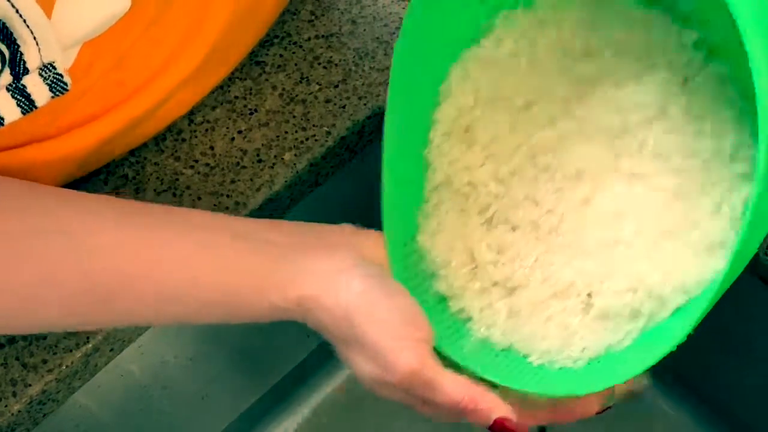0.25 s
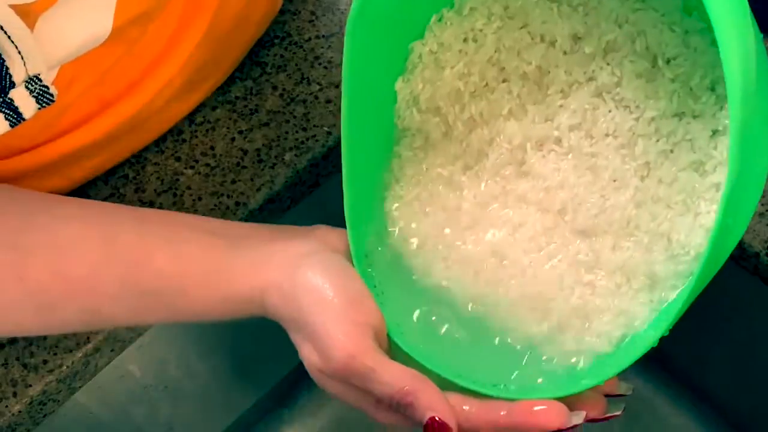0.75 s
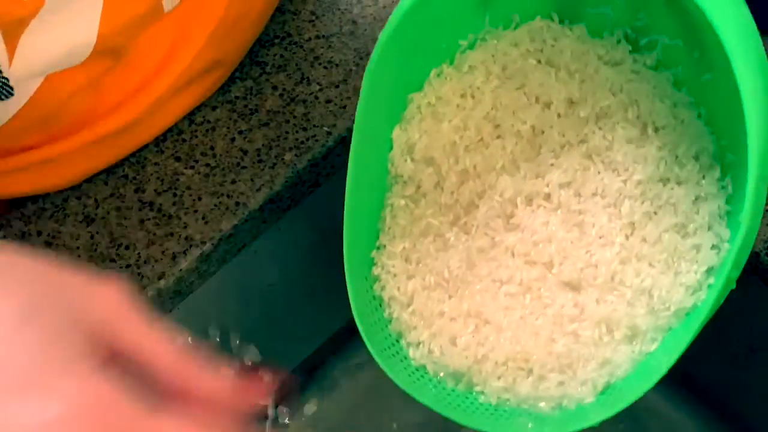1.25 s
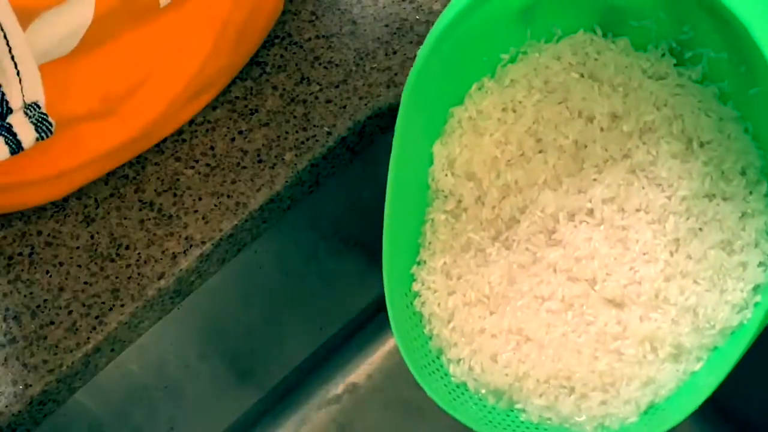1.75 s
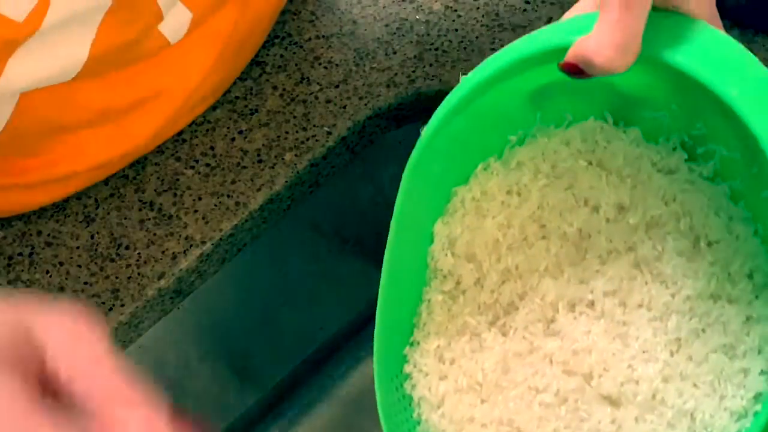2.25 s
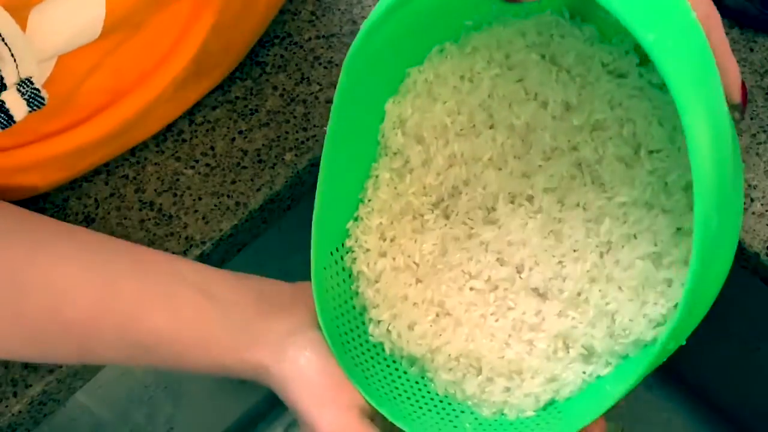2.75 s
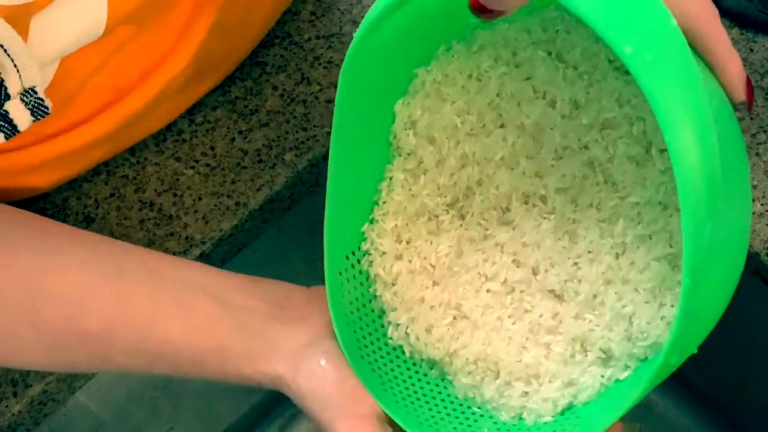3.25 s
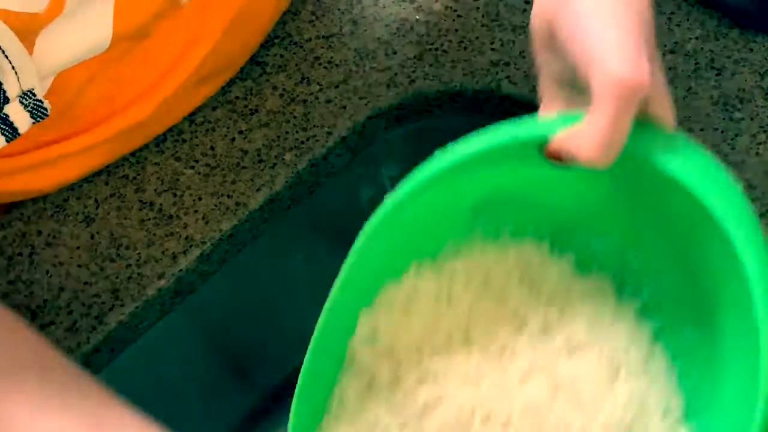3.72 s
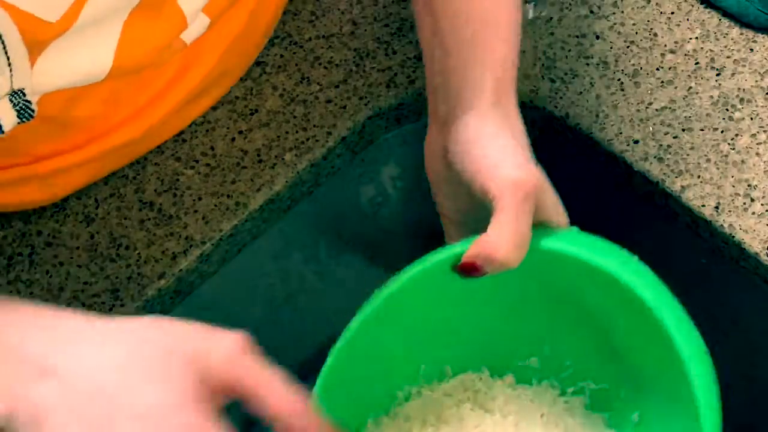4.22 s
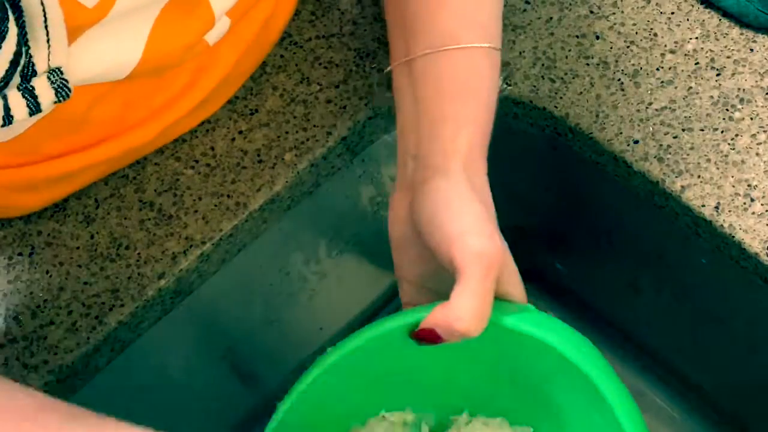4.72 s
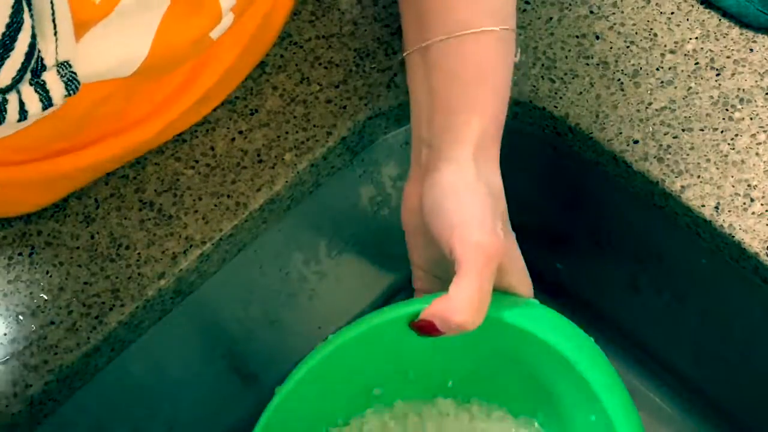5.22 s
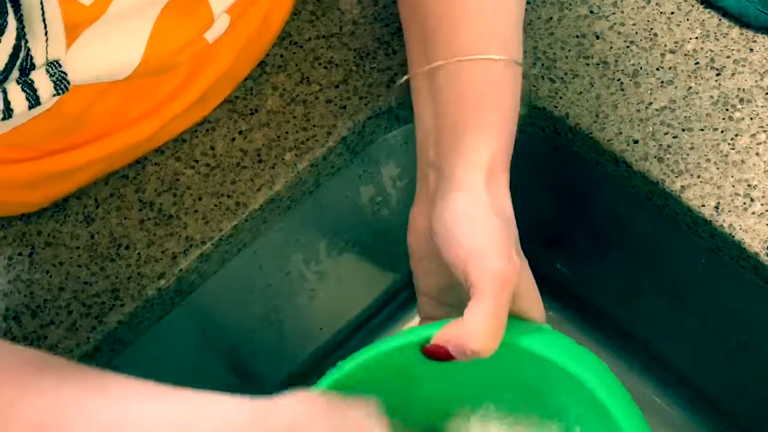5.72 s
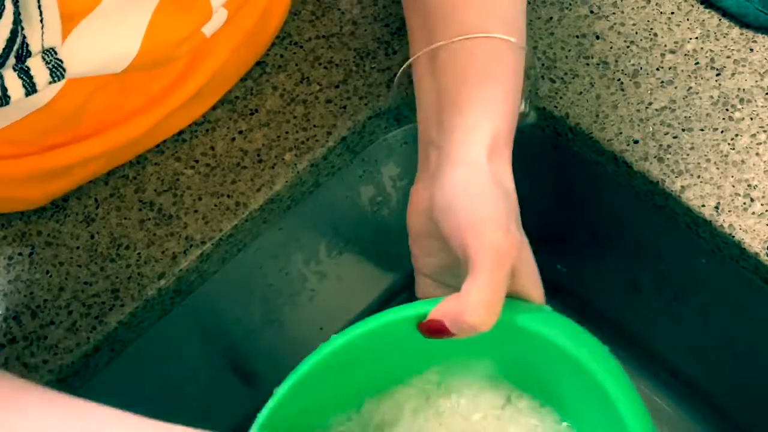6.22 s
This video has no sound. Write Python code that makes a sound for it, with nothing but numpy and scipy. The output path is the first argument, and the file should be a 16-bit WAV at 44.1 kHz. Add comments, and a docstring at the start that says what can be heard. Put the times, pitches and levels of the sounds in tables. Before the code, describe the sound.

A bright tap hiss and fizzing foam over rice in a plastic colander, water drumming on a steel sink, then softer gurgling with hollow plops.

```python
"""An aerated kitchen tap runs on rice in a plastic colander held over a steel sink: coloured noise hisses,
and foam on the grains fizzes as a cloud of tiny bursting bubbles.
Water draining through rings the sink's modes and spatters as random impacts and bubbles; fat drops slap.
Near four seconds the colander leaves the stream: the hiss drops and a softer flow gurgles into shallow
water, with ringing air pockets that rise slightly in pitch. Low room noise lies under everything."""
import sys
import numpy as np
from scipy import signal
from scipy.fft import rfft, irfft, next_fast_len
from scipy.io import wavfile
from scipy.ndimage import uniform_filter1d

SR = 44100
rng = np.random.default_rng(int(sys.argv[2]) if len(sys.argv) > 2 else 0)


def materialize(psi):
    """Save the field psi as 16-bit PCM at rate SR to the path in sys.argv[1].

    A 1-D psi becomes a single channel; in a 2-D psi each row is a channel.
    """
    bounded = np.clip(np.atleast_2d(psi).T, -1, 1)
    quanta = np.round(bounded * 32767).astype(np.int16)
    wavfile.write(sys.argv[1], SR, quanta)


N = 285327
TIME = np.arange(N) / SR

# Water draining from the colander, heaviest while it is tipped. Each row: time in seconds,
# drumming on the steel in dB, spatter in dB (both relative).
DRAINAGE = [(0, -38, -33), (.46, -41.5, -34), (.52, -35, -33), (1.33, -33.5, -33), (1.5, -40, -37),
            (2.9, -40, -36), (3.25, -40, -35), (3.8, -40, -36), (4.05, -51, -47.5), (4.45, -47, -45),
            (4.75, -59.5, -39), (5.45, -60, -44.5), (5.85, -51.5, -40.5), (6.47, -42.5, -45)]
# Large air pockets trapped in the puddle. Each row: start in seconds, peak in dB, pitch in Hz,
# swell in seconds, offshoot bubble in dB against the peak.
AIR_POCKETS = [(3.92, -42, 804, 0.0033, -12), (4.004, -38, 785, 0.0041, -15),
               (4.394, -33, 915, 0.0018, -15), (4.412, -28, 850, 0.00099, -12),
               (4.91, -22, 930, 0.0011, -13), (5.094, -33, 872, 0.0042, -14),
               (5.302, -37, 1030, 0.0013, -8), (5.5075, -27.5, 874, 0.0027, -10),
               (5.601, -34, 885, 0.0021, -10), (5.664, -30, 780, 0.0035, -6),
               (5.698, -31, 895, 0.0012, -10), (5.706, -29, 950, 0.0012, -14),
               (5.783, -27, 870, 0.0008, -12), (5.842, -27, 960, 0.0015, -6), (5.86, -35, 930, 0.0031, -9),
               (5.933, -30, 910, .0012, -15), (6.012, -30, 910, 0.0019, -11), (6.101, -31, 940, 0.001, -2),
               (6.117, -32, 920, 0.0017, -1), (6.137, -23.5, 796, 0.0024, -9), (6.217, -38, 810, 0.0022, 2),
               (6.3, -21.5, 820, 0.0019, -8), (6.318, -33, 910, 0.0033, -16),
               (6.346, -29, 837, 0.0031, -14), (6.365, -29, 950, 0.0022, -14),
               (6.38, -33, 890, 0.0013, -14), (6.417, -28, 806, 0.0032, -5), (6.426, -27, 888, 0.003, -5),
               (6.443, -28, 830, 0.002, -9)]


def from_db(db):
    """Decibels to gain."""
    return 10 ** (np.asarray(db) / 20)


def rms_one(x):
    """Scale to unit rms."""
    return x / np.sqrt(np.mean(x ** 2) + 1e-20)


def gains(rows):
    """Each dB column of a curve as a gain per sample."""
    s, *columns = np.transpose(rows)
    return [from_db(np.interp(TIME, s, c)) for c in columns]


def drift(rate_hz):
    """Slow random wander of spread 1: low-passed noise, drawn at every 40th sample."""
    step, settle = 40, 2000
    r = np.exp(-2 * np.pi * rate_hz * step / SR)
    noise = rng.standard_normal(N // step + settle + 2)
    slow = signal.lfilter([1], [1, -2 * r, r * r], noise)[settle:]
    return np.interp(np.arange(N) / step, np.arange(len(slow)), rms_one(slow))


def coloured(x, colour):
    """Give a signal a smooth spectrum, dB interpolated over log frequency; rms 1."""
    hz, db = np.transpose(colour)
    size = next_fast_len(N, True)
    log_hz = np.log(np.fft.rfftfreq(size, 1 / SR) + 1)
    shape = from_db(np.interp(log_hz, np.log(hz), db))
    return rms_one(irfft(rfft(x, size) * shape, size)[..., :N])


def ring(clicks, hz, t60_s):
    """A unit click sets a decaying sine of height 1 ringing in a two-pole resonator."""
    r = from_db(-60 / (t60_s * SR))
    w = 2 * np.pi * hz / SR
    return signal.lfilter([0, np.sin(w)], [1, -2 * r * np.cos(w), r * r], clicks + 1e-18)


def drops(per_s, spread_db):
    """Impacts at random moments, many small and a few large, of either sign."""
    heights = from_db(spread_db * np.minimum(rng.exponential(1, N), 5))
    sizes = heights * rng.choice([-1, 1], N)
    return sizes * (rng.random(N) < per_s / SR)


def placed(x, lag_s, pan_db):
    """Stereo image of a point source; positive lag reaches the left late, positive pan favours it."""
    size = next_fast_len(N, True)
    delay = np.exp(-2j * np.pi * np.fft.rfftfreq(size, 1 / SR) * lag_s)
    left = irfft(rfft(x, size) * delay, size)[:N]
    return np.array([left * from_db(pan_db / 2), x * from_db(-pan_db / 2)])


def basin(x, wet_db, t60_s):
    """Dense reflections from the sink walls and the kitchen, different on each side."""
    t = TIME[:SR // 3]
    decay = from_db(-60 * t / t60_s) * (t > .001)
    echoes = rng.standard_normal((2, len(t))) * decay
    echoes /= np.sqrt(np.sum(echoes ** 2, axis=1, keepdims=True))
    return x + from_db(wet_db) * signal.fftconvolve(x, echoes, axes=1)[:, :N]


def resonant(x, modes):
    """The modes of a body or hollow lift narrow bands of whatever sounds inside it; rms 1."""
    lifted = x
    for hz, db, t60_s in modes:
        q = hz * t60_s * np.pi / np.log(1000)
        lifted = lifted + from_db(db) * signal.lfilter(*signal.iirpeak(hz, q, fs=SR), x)
    return rms_one(lifted)


def bubbles(count, low_hz, high_hz, cycles, spread_db, lag_spread_s):
    """Stereo cloud of bubbles, each with its own moment, size, place and slightly rising pitch; rms 1."""
    when, pitch, strength, damping, place, pan = rng.random((count, 6)).T[:, :, None]
    hz = low_hz * (high_hz / low_hz) ** pitch
    life_s = cycles * (.5 + damping) / hz
    t = TIME[:min(int(3 * SR * cycles / low_hz), SR // 40)]
    peak = from_db(spread_db * np.minimum(-np.log(1 - strength), 4)) * hz / high_hz
    envelope = peak * np.exp(-t / life_s) * (1 - np.exp(-t * hz))
    note = envelope * np.sin(2 * np.pi * hz * t * (1 + 0.015 * t / life_s))
    sides = []
    for side in (-1, 1):
        lag = (1 + side * (place - .5)) * lag_spread_s * SR
        at = (when * N + lag).astype(int) + np.arange(len(t))
        heard = note * from_db(side * 8.0 * (pan - .5))
        sides.append(np.bincount(at.ravel(), heard.ravel(), N)[:N])
    return rms_one(np.array(sides))


def kitchen():
    """Low, even room noise, mostly common to both sides."""
    # Each row: frequency in Hz, relative spectral level in dB.
    room_colour = [(20, -12), (55, 0), (120, -2), (300, -1.5), (600, -11.5), (2000, -7.5), (10000, -69)]
    air = rng.standard_normal(N) + 0.084 * rng.standard_normal((2, N))
    return from_db(-51.5) * coloured(air, room_colour)


def stream(jet_level, foam_level):
    """Air mixed into the jet hisses; its tiny bubbles burst in clumps on the rice."""
    # Hiss, then fizz. Each row: frequency in Hz, relative spectral level in dB.
    jet_colour = [(500, -29), (2000, -34), (4500, -6.5), (7000, 1), (9500, 4.5), (12000, 1.5), (15500, 1.5)]
    foam_colour = [(2500, -17), (5000, -9.5), (6400, 11), (7600, -5), (8200, 8), (9050, 6), (10000, 3.5),
                   (12000, -23), (16000, -50)]
    flutter = from_db(1.0 * drift(90))
    jet = jet_level * coloured(rng.standard_normal(N) * flutter, jet_colour)
    fizz = bubbles(count=14000, low_hz=5340, high_hz=13100, cycles=2.0, spread_db=1.0, lag_spread_s=0)[0]
    foam = foam_level * coloured(fizz * from_db(3.2 * drift(24)), foam_colour)
    # reflections smear both into a smooth wash, different on each side
    jet_wash = jet_level * coloured(rng.standard_normal((2, N)), jet_colour)
    foam_wash = foam_level * coloured(rng.standard_normal((2, N)), foam_colour)
    direct = placed(jet + foam, lag_s=.000221, pan_db=-1.0)
    sway = from_db(.55 * drift(10))
    return sway * from_db(3.5) * (direct + from_db(-10.0) * (jet_wash + foam_wash))


def spatter():
    """Droplets land in bursts at several spots across colander and sink, leaving small ringing bubbles."""
    # Each row: frequency in Hz, relative spectral level in dB.
    spatter_colour = [(200, -11), (650, -4.5), (1050, -8), (1320, -1.5), (2100, -4.5), (2700, -1.5),
                      (3400, 3.5), (3950, 3), (4500, -1.5), (6300, 2), (8000, 0), (15000, -57)]
    # The colander's wall, rung by droplets. Each row: frequency in Hz, lift in dB, t60 in seconds.
    colander_modes = [(1777, 0, 0.066), (2350, -5, 0.068), (2710, 6, 0.065), (3710, -14, 0.023),
                      (4004, -1.5, 0.0099), (4490, 11.5, 0.064), (4830, -22, 0.057), (6300, -8, 0.0028)]
    ticks = 0
    for lag_s in (-.00007, -.00003, .00002):
        bursts = 1800 * from_db(3.3 * drift(25))
        ticks = ticks + placed(drops(bursts, spread_db=4.5), lag_s, pan_db=3.5)
    tinkle = bubbles(count=3500, low_hz=1519, high_hz=6990, cycles=5.6, spread_db=2.0, lag_spread_s=.0003)
    sway = from_db(0.32 * drift(16.0))
    water = basin((rms_one(ticks) + from_db(-6.0) * tinkle) * sway, wet_db=2, t60_s=0.12)
    level = gains(DRAINAGE)[1] * from_db(3.5)
    return level * resonant(coloured(water, spatter_colour), colander_modes)


def pour():
    """Strands through the tipped colander's mesh break up in clumps, each a spray of small bubbles."""
    # Each row: time in seconds, level in dB.
    strands = [(0, -42), (.45, -42), (.51, -36), (.8, -38), (1.3, -41), (1.5, -50), (3.0, -53), (3.25, -48),
               (3.8, -48), (4.0, -72)]
    # Each row: frequency in Hz, relative spectral level in dB.
    strand_colour = [(1200, -4.5), (2200, -4), (2700, -0.5), (3700, 6), (4400, -0.5), (5500, -16)]
    cloud = bubbles(count=5000, low_hz=1399, high_hz=5175, cycles=10.0, spread_db=1.5, lag_spread_s=.0001)
    clumps = from_db(2.3 * drift(40))
    return gains(strands)[0] * basin(coloured(cloud * clumps, strand_colour), wet_db=-1.5, t60_s=0.14)


def falling_water():
    """Strength of the water reaching the steel: an uneven throbbing run-off plus swelling gushes."""
    # Gushes and clumps landing on the steel. Each row: centre in seconds, peak in dB, swell in seconds.
    clumps = [(0.136, -38, 0.033), (.28, -33, 0.025), (.561, -30, 0.014), (.602, -29, 0.018),
              (.675, -35, 0.0074), (0.712, -22, 0.0053), (.754, -27.5, 0.0085), (.895, -30, 0.012),
              (.948, -27, 0.013), (.99, -27.5, 0.015), (1.06, -32, 0.019), (1.154, -28, 0.0074),
              (1.186, -32, 0.0067), (1.261, -25.5, 0.02), (1.332, -27, .009), (1.366, -30, 0.009),
              (1.424, -30, .014), (1.662, -31.5, 0.012), (1.837, -34.5, 0.018), (1.988, -34, 0.0096),
              (2.103, -34, 0.023), (2.17, -33, 0.012), (2.298, -38, 0.01), (2.558, -37, 0.017),
              (2.806, -34, 0.019), (2.899, -43, 0.012), (3.06, -33.5, 0.018), (3.181, -35, 0.0088),
              (3.259, -34.5, 0.011), (3.574, -35, 0.015), (3.725, -35, .014), (3.845, -32, 0.069),
              (4.4, -37, 0.048), (6.18, -37, 0.0076), (6.257, -35.5, 0.022)]
    throb_db, throb_hz = 2.5, 20
    run_off = gains(DRAINAGE)[0] * from_db(throb_db * drift(throb_hz))
    gushes = [from_db(db) * np.exp(-.5 * ((TIME - s) / swell_s) ** 2) for s, db, swell_s in clumps]
    return np.sqrt(run_off ** 2 + np.sum(np.square(gushes), axis=0))


def drumming():
    """Falling drops strike the thin steel, each exciting its modes in its own proportions."""
    # Steel sink bottom. Each row: frequency in Hz, relative level in dB, t60 in seconds.
    sink_modes = [(125.6, -10.5, 0.2), (152.2, 1, 0.45), (161.7, -4.5, 0.17), (188, -8, 0.23),
                  (229, -16.5, 0.27), (298.3, -19, 0.28), (322.6, -14, 0.13), (402.6, -16.5, 0.14),
                  (440, -15.5, 0.16), (577, -27, 0.26)]
    # Nearer the edge the water excites the higher modes more. Each row: time in seconds, tilt in dB per octave.
    landing = [(0, -4), (.45, -2), (.6, 0), (1.4, -0.5), (1.9, 3), (2.6, 4.5), (3.4, 1.5), (3.9, -1.5),
               (4.4, 2.5), (6.47, -1)]
    thump_below_hz, sing_db = 260, 2
    hits, tilt = drops(900, spread_db=1.0), gains(landing)[0]
    pivot_hz = sink_modes[1][0]
    low, high = 0, 0
    for hz, db, t60_s in sink_modes:
        ringing = ring(hits * rng.standard_normal(N), hz, t60_s)
        mode = from_db(db) * tilt ** np.log2(hz / pivot_hz) * ringing
        if hz < thump_below_hz:
            low = low + mode
        else:
            high = high + mode
    # the low modes follow every clump, the high ones only the mean flow
    water = falling_water()
    power = (low + high) ** 2
    quick_power = uniform_filter1d(uniform_filter1d(power, size=1400), size=600)
    thumps = water * low / np.sqrt(quick_power + 1e-9)
    slow_power = uniform_filter1d(power, size=30000)
    singing = uniform_filter1d(water, size=9000) * high / np.sqrt(slow_power + 1e-9)
    # the plate radiates little below its lowest mode
    radiation = signal.butter(4, 116, "high", fs=SR, output="sos")
    steel = signal.sosfilt(radiation, thumps + from_db(sing_db) * singing)
    return placed(steel, lag_s=-0.00006, pan_db=-2.0)


def slaps():
    """A fat drop cracks, rings for a few cycles and throws off a dying spray amid a patter of droplets."""
    # Drops on colander and sink. Each row: start in seconds, level in dB, centre in Hz, spray decay in seconds.
    fat_drops = [(0.517, -15, 4100, 0.0036), (0.524, -20, 4030, .0034), (0.5894, -18, 3840, 0.0018),
                 (0.597, -16, 4500, 0.0047), (.616, -20, 4160, .0015), (0.661, -15.5, 6450, .004),
                 (0.744, -17, 4120, 0.005), (1.051, -17, 3980, .0034), (1.26, -16, 4000, 0.0066),
                 (1.28, -22, 2900, .004), (1.3064, -22, 2240, .004), (2.5297, -26, 6890, .002),
                 (3.176, -19.5, 4150, .0034), (3.21, -19, 4120, 0.003), (3.818, -26, 4800, .005),
                 (3.903, -17.5, 9200, 0.0042), (3.937, -20.5, 6750, 0.0022), (4.232, -23.5, 5830, 0.0045),
                 (4.288, -29, 4900, .003), (4.413, -23, 4740, 0.0029), (4.421, -24.5, 2560, .005),
                 (4.431, -27, 2690, .005), (4.911, -24, 3850, .004), (5.045, -25, 3350, .009),
                 (5.06, -23, 3100, .008), (5.301, -21, 2580, .002), (5.3085, -20, 2680, 0.0026),
                 (5.631, -20, 3270, .0016), (5.6655, -16, 3700, .003), (6.249, -26, 3620, 0.013)]
    # fine droplets run ahead of each fat drop and patter down after it
    patter_db, patter_rise_s, patter_decay_s = -20, 0.013, .016
    out, lead = np.zeros(N), SR // 25
    t = TIME[:SR // 8] - TIME[lead]
    after, landed = np.maximum(t, 0), t >= 0
    patter = from_db(patter_db) * np.exp(-np.maximum(-t / patter_rise_s, t / patter_decay_s))
    for s, db, hz, spray_s in fat_drops:
        burst = 0.44 * landed * np.exp(-after / spray_s)
        contact = signal.butter(2, [hz / 1.6, min(hz * 1.48, SR / 3)], "band", fs=SR, output="sos")
        noise = rms_one(signal.sosfilt(contact, rng.standard_normal(len(t))))
        spray = noise * np.hypot(burst, patter)
        crack = 0.87 * np.sin(2 * np.pi * hz * after) * np.exp(-after * hz / 3)
        at = round(s * SR) - lead
        out[at:at + len(t)] += (from_db(db) * (crack + spray))[:N - at]
    return basin(placed(out, lag_s=-0.000017, pan_db=1.5), wet_db=0, t60_s=0.14)


def churning():
    """Relative strength of the gurgle: it grows as the puddle deepens and flares around each plop."""
    # starts when the stream reaches the puddle
    start_s, onset_s, start_db, deepening_db_per_s = 3.75, 0.25, -62, 8
    # lesser bubbles stirred up by each plop, against its peak
    swarm_db, swarm_rise_s, swarm_decay_s = -21, 0.005, 0.055
    age_s = TIME - start_s
    onset = np.clip(age_s / onset_s, 0, 1)
    power = (onset * from_db(start_db + deepening_db_per_s * age_s)) ** 2
    for s, db, *_ in AIR_POCKETS:
        swarm = np.exp(-np.maximum((s - TIME) / swarm_rise_s, (TIME - s) / swarm_decay_s))
        power = power + (from_db(db + swarm_db) * swarm) ** 2
    return np.sqrt(power)


def gurgle(splash_level):
    """Water splashes into the puddle; large trapped bubbles ring briefly and dully, small ones brightly."""
    # Large bubbles, then splash. Each row: frequency in Hz, relative spectral level in dB.
    gurgle_colour = [(200, -4), (500, 18), (650, -5), (880, -1.5), (1100, -12), (1550, -1), (3000, -9)]
    splash_colour = [(300, -4), (650, -11.5), (850, 0), (1300, 2), (2100, 4), (2800, 5.5), (4200, 1),
                     (7000, -41), (15000, -42)]
    # Air and walls of the sink. Each row: frequency in Hz, lift in dB, t60 in seconds.
    basin_modes = [(722, 10, 0.091), (885, 5.5, 0.015), (1255, 1, 0.044), (2440, -18, 0.19),
                   (4075, -21, 0.05), (4700, 2.5, 0.0095)]
    large = bubbles(count=1100, low_hz=703, high_hz=1700, cycles=2.3, spread_db=2.5, lag_spread_s=.00006)
    large = coloured(large, gurgle_colour)
    small = bubbles(count=2800, low_hz=1023, high_hz=4580, cycles=8.2, spread_db=2.5, lag_spread_s=0.00016)
    impacts = rms_one(drops(2500, spread_db=0.0))
    splash = coloured(small + from_db(6.0) * impacts, splash_colour) * from_db(0.59 * drift(26))
    deep = churning() * from_db(-1.0) * resonant(large, basin_modes)
    bright = splash_level * from_db(1.0) * resonant(splash, basin_modes)
    balance = from_db([[.8], [-.8]])
    return basin((deep + bright) * balance, wet_db=-8, t60_s=0.25)


def trickle():
    """As the colander is lowered, a thin trickle gulps air that rings in the hollow beneath it."""
    # Each row: time in seconds, level in dB.
    flow_curve = [(3.6, -75), (3.8, -58), (4.05, -44.5), (4.3, -50.5), (4.5, -45.5), (4.65, -68)]
    # Each row: frequency in Hz, relative spectral level in dB.
    gulp_colour = [(200, 0), (500, -2.5), (850, 2), (1080, -17), (1750, 0), (2500, -22)]
    # Hollow between colander and sink. Each row: frequency in Hz, lift in dB, t60 in seconds.
    hollow_modes = [(820, 5, 0.046), (1250, 11, 0.061), (1750, -6, 0.02)]
    gulps = bubbles(count=2500, low_hz=417, high_hz=2000, cycles=4.4, spread_db=0.5, lag_spread_s=.00006)
    return gains(flow_curve)[0] * resonant(coloured(gulps, gulp_colour), hollow_modes)


def drips():
    """Sparse droplets on the wet steel each leave a tiny, quickly damped bubble."""
    # Heard once the colander is lowered. Each row: time in seconds, level in dB.
    drip_curve = [(3.7, -70), (4.0, -58), (4.7, -47), (5.4, -50.5), (5.8, -61), (6.47, -52)]
    ticks = bubbles(count=420, low_hz=1410, high_hz=4940, cycles=4.0, spread_db=0.0, lag_spread_s=0.0001)
    return gains(drip_curve)[0] * basin(ticks, wet_db=2, t60_s=0.19)


def pocket(t, hz, swell_s):
    """An air pocket swells into a note, curt or ringing, and rises in pitch as it nears the surface."""
    rise_per_swell = 0.019  # share of the pitch
    t = np.maximum(t, 0)
    age = t / swell_s
    return age * np.exp(1 - age) * np.sin(2 * np.pi * hz * t * (1 + rise_per_swell * age / 2))


def plops():
    """Water slops over an air pocket, which rings and sheds a smaller, higher bubble."""
    slop_db, slop_decay_s = -13, 0.0073
    offshoot_ratio, offshoot_lag_s = 1.4, 0.00117
    out, t = np.zeros(N), TIME[:SR // 20]
    slop_band = signal.butter(2, [440, 2100], "band", fs=SR, output="sos")
    slop_envelope = from_db(slop_db) * np.exp(-t / slop_decay_s)
    for s, db, hz, swell_s, offshoot_db in AIR_POCKETS:
        offshoot = from_db(offshoot_db) * pocket(t - offshoot_lag_s, hz * offshoot_ratio, swell_s)
        note = pocket(t, hz, swell_s) + offshoot
        slop = slop_envelope * rms_one(signal.sosfilt(slop_band, rng.standard_normal(len(t))))
        at = round(s * SR)
        out[at:at + len(t)] += (from_db(db) * (note + slop))[:N - at]
    return basin(placed(out, lag_s=-.00001, pan_db=1.5), wet_db=-5, t60_s=0.22)


def scene():
    """All the water sounds over the room noise."""
    # Each row: time in seconds, then jet hiss, fizz on the rice and puddle splashing in relative dB.
    flow = [(0, -31, -37.5, -70), (.45, -30.5, -34.5, -64), (.6, -31, -33, -46.5), (1.3, -28.5, -43, -47),
            (1.55, -30, -34, -46.5), (2.3, -30.5, -35.5, -47.5), (3.7, -29, -38.5, -48),
            (3.81, -30, -46, -40), (3.87, -37, -45, -42.5), (4.0, -39, -56, -44.5), (4.3, -38, -58, -44),
            (4.8, -35, -58, -41.5), (5.2, -37, -64, -41.5), (5.8, -36.5, -67, -38.5),
            (6.47, -37.5, -48, -40)]
    jet, foam, splash = gains(flow)
    draining = spatter() + pour() + drumming() + trickle() + drips()
    puddle = gurgle(splash) + plops()
    return stream(jet, foam) + draining + puddle + slaps() + kitchen()


def record(dry):
    """The level dips for an instant and the top is cut."""
    # Each row: time in seconds, level in dB.
    dip = [(.452, -1.5), (.466, -11), (.477, -22.5), (.491, -7.5), (.506, -1.5), (.52, -1)]
    cutoff_hz = 15400
    top_cut = signal.ellip(12, .1, 80, cutoff_hz, fs=SR, output="sos")
    return signal.sosfilt(top_cut, dry * gains(dip)[0])


dry = scene()
out = record(dry)
materialize(out)
```